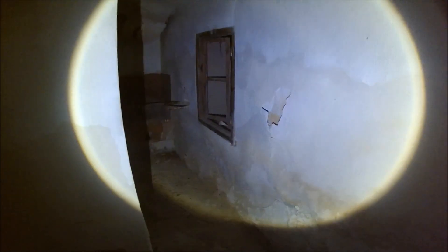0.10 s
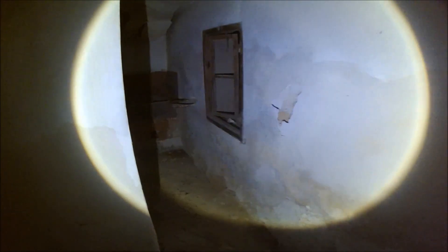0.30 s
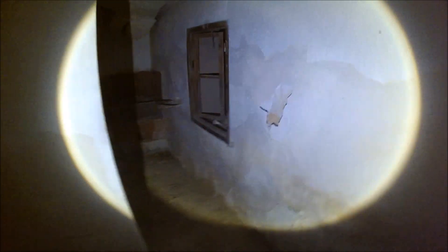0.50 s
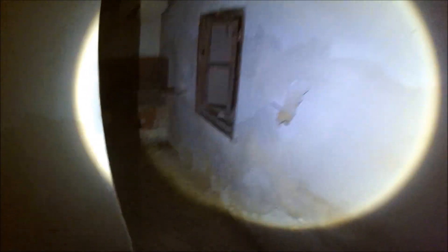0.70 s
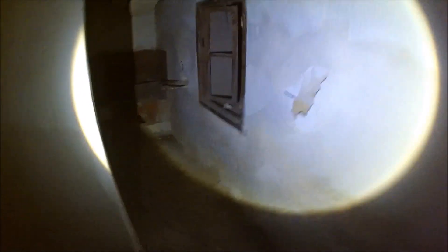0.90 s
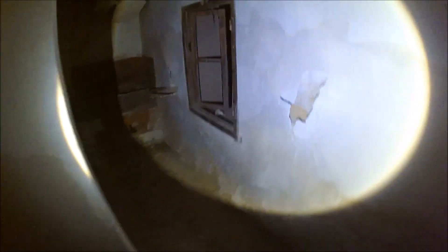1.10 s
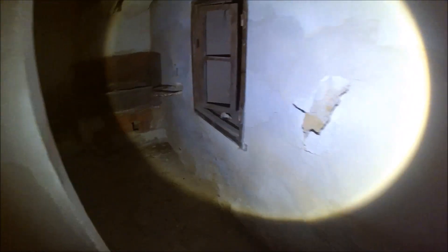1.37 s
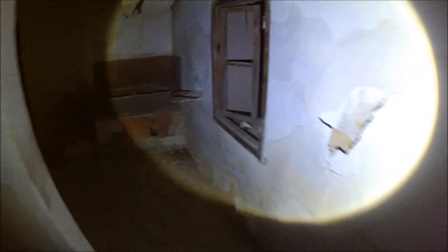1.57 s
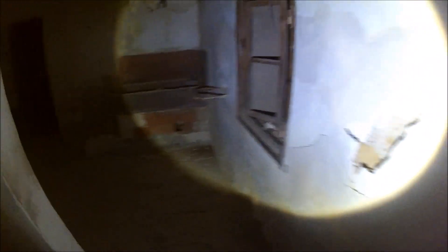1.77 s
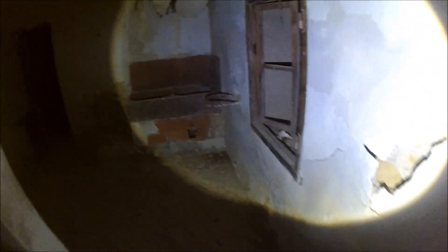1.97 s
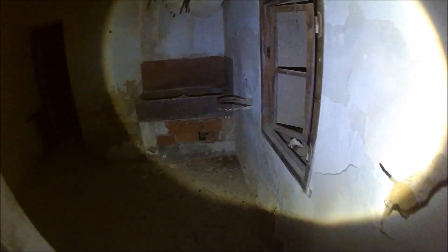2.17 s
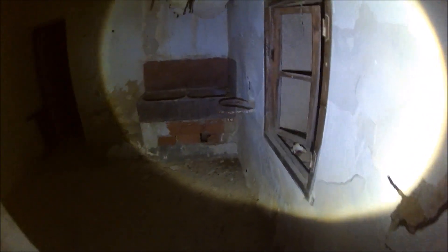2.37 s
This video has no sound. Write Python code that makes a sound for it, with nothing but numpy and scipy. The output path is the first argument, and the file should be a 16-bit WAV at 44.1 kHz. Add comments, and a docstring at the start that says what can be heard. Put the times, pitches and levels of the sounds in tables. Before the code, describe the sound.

Slow footsteps knock and crunch over plaster rubble in a small, bare, echoing room

```python
"""Steps over rubble in a small bare room

Plaster and brick knock under the shoes (damped rings and cracks), soles grind on grit (resonant grains)
and footfalls thud softly (low noise bursts); all three echo in the room. Close by, a hand rubs on a camera's
case (dense slips), which clicks sharply and later faintly (ringing modes). The narrow, nasal microphone
colours all of these; a steady hiss with a faint high whine lies underneath."""
import sys
import numpy as np
from scipy import signal
from scipy.fft import rfft, irfft
from scipy.io import wavfile

SR = 44100
rng = np.random.default_rng(int(sys.argv[2]) if len(sys.argv) > 2 else 0)


def wav_record(signal):
    """Record a signal, one row per channel, as 16-bit PCM in the file named by sys.argv[1]."""
    frames = np.transpose(np.atleast_2d(signal))
    bounded = np.clip(frames, -1, 1)
    # unit amplitude maps onto the largest positive 16-bit level
    quanta = np.round(bounded * 32767).astype(np.int16)
    wavfile.write(sys.argv[1], SR, quanta)


N = 110250
TIME_S = np.arange(N) / SR

# steady hiss, relative spectrum: freq_hz, level_db
HISS_SPECTRUM = [(30, -33.5), (100, -24.5), (300, -19.5), (600, -15), (950, -8), (1350, -0.5), (1850, 2),
                 (2400, -2.5), (3400, -9), (4400, -21.5), (5200, -28), (6000, -43.5), (7000, -37),
                 (8000, -42.5), (9000, -36.5), (10500, -29), (12500, -29.5), (15500, -28.5)]
HISS_DB, HISS_WAVER_DB, HISS_WAVER_CUTOFF_HZ = -64.5, 1.1, 36
WHINE_HZ, WHINE_RMS_DB = 15714, -95.5

# microphone behind its small port: freq_hz, gain_db
MIC_RESPONSE = [(60, -42.5), (180, -35.5), (400, -31), (650, -25), (900, -13.5), (1100, -15.5),
                (1350, -5.5), (1800, -3), (2300, -7), (3000, -9), (3500, -14.5), (4400, -20.5),
                (5000, -28.5), (5500, -38), (6050, -59.5), (7000, -48.5), (8000, -56), (8800, -46),
                (10500, -33), (12500, -43.5), (14500, -41), (16000, -55)]
CUTOFF_HZ = 15850

# early echoes off floor and wall: delay_s, level_db
EARLY_ECHOES = [(.0040, -11.5), (.0175, -26)]
ROOM_DB, ROOM_T60_S = -4, 0.32
LATE_DB, LATE_T60_S = -24.5, 1
TAIL_BUILD_S, REFLECTIONS_PER_S = 0.002, 1300

# hand rubs on the case: start_s, length_s, level_db
HAND_RUBS = [(0.105, 0.023, -37.5), (0.131, 0.09, -43.5), (0.18, 0.048, -39), (.222, 0.045, -42.5),
             (0.774, 0.048, -25), (0.834, 0.021, -32.5), (0.878, 0.056, -38)]
# colour of the rubbing: freq_hz, gain_db
RUB_RESPONSE = [(150, -10.5), (800, -6), (1250, -4.5), (1700, 0), (2250, 3.5), (2800, -10), (3400, 0.5),
                (4600, -3.5), (7000, -1.5), (10500, -9.5), (15000, -2)]
RUB_ATTACK_S, RUB_RELEASE_S, SLIPS_PER_S = 0.011, 0.0096, 3500

# case clicks: start_s, level_db, edge_db
CLICKS = [(0.2213, 15.5, -5), (0.2233, -0.5, -46.5), (1.513, -33, 5)]
# modes of the case: freq_hz, width_hz, level_db
CLICK_MODES = [(567, 110, -3.5), (890, 71, -9.5), (1785, 186, 8), (2600, 440, 2), (2950, 130, -0.5),
               (3560, 290, 2), (4130, 390, 5.5), (4870, 620, 4.5), (10750, 800, 0)]
CLICK_EDGE_HZ = 8500

# weight comes down on the floor: start_s, level_db, decay_s, centre_hz
FOOT_THUDS = [(0.109, -36, 0.0081, 200), (0.371, -41, 0.016, 310), (0.554, -32.5, 0.068, 120),
              (1.306, -42, 0.031, 580), (1.419, -43.5, .08, 330), (2.095, -49.5, 0.041, 250)]
THUD_ATTACK_S, THUD_WIDTH_HZ = 0.0049, 220

# sole grinds on grit: start_s, length_s, level_db, centre_hz
SOLE_SCUFFS = [(0.393, 0.035, -48, 1790), (0.454, 0.051, -40, 2100), (0.49, 0.036, -37.5, 3000),
               (0.558, 0.061, -34, 1100), (0.665, 0.099, -44, 1900), (0.931, 0.046, -48, 1350),
               (1.177, 0.041, -48.5, 2180), (1.295, 0.024, -38, 1200), (1.371, 0.01, -43, 1800),
               (1.381, 0.08, -36, 1670), (1.61, 0.018, -39.5, 2100), (1.637, 0.041, -40.5, 1050),
               (2.091, 0.013, -31, 1170), (2.29, 0.014, -44, 1300), (2.485, 0.026, -43, 2250)]
SCUFF_ATTACK_S, SCUFF_RELEASE_S, SCUFF_WIDTH_HZ = 0.021, 0.01, 740
GRIT_PER_S, RAW_GRIT_DB = 2100, -6.5

# rubble knocks: start_s, ring_db, ring_hz, overtone_db, crack_db, contact_hz (hardness, as low-pass cutoff)
RUBBLE_KNOCKS = [(0.1114, 2, 890, 6, -8.5, 2870), (0.374, -7.5, 1430, -1, -23, 3580),
                 (0.4744, -10.5, 1544, -7.5, -16, 4500), (.557, 10.5, 994, 6.5, -10.5, 2500),
                 (0.5585, -4, 1310, -10, -18, 2500), (0.5757, -17, 1480, -9, -19, 3000),
                 (0.599, 7.5, 1050, -7.5, -11, 3000), (0.934, -1, 1230, -18, -16, 3020),
                 (1.187, -13.5, 1420, -25.5, -34, 2440), (1.306, -3.5, 1500, -8, -7.5, 3910),
                 (1.374, -12, 1470, -17.5, -17.5, 4000), (1.3979, -5, 1590, 7, -6.5, 4000),
                 (1.455, -7, 1325, -12, -8.5, 5100), (1.514, 3.5, 1490, -6.5, -3.5, 3230),
                 (1.5967, 11, 1394, -39, -16.5, 2200), (1.6248, -4.5, 1880, -0.5, -10.5, 3370),
                 (2.075, 13, 1350, 3, -13, 2200), (2.0931, 19.5, 1238, -2.5, -4.5, 2640),
                 (2.302, -6.5, 1340, -14, -26, 3000), (2.413, -15, 1340, -16, -29, 3000),
                 (2.471, -17.5, 1540, -7, -25.5, 4000)]
KNOCK_WIDTH_HZ, OVERTONE_RATIO = 190, 1.56


def from_db(db):
    """Decibels to gain."""
    return 10 ** (np.asarray(db) / 20)


def rms_one(x):
    """Scale to unit rms."""
    return x / np.sqrt(np.mean(x ** 2) + 1e-20)


def impulse(start_s):
    """Unit click at start_s, on a negligible constant floor."""
    return 1.0 * (np.arange(N) == int(start_s * SR)) + 1e-18


def band(x, cutoff_hz, kind, order=2):
    """Butterworth filter."""
    safe_hz = np.clip(cutoff_hz, 10, 0.45 * SR)
    return signal.sosfilt(signal.butter(order, safe_hz, kind, fs=SR, output="sos"), x)


def resonate(x, centre_hz, width_hz):
    """One two-pole resonance with about unit gain at its peak."""
    radius = np.exp(-np.pi * width_hz / SR)
    numerator = np.array([1, 0, -1]) * (1 - radius * radius) / 2
    denominator = [1, -2 * radius * np.cos(2 * np.pi * centre_hz / SR), radius * radius]
    return signal.lfilter(numerator, denominator, x)


def colour(x, points, size=4096):
    """Causal minimum-phase filter through (freq_hz, gain_db) points, by folding the cepstrum."""
    point_hz, point_db = np.transpose(points)
    bin_hz = np.arange(size // 2 + 1) * SR / size
    gain_db = np.interp(np.log(bin_hz + 1), np.log(point_hz), point_db)
    cepstrum = irfft(np.log(from_db(gain_db)))
    cepstrum[1:size // 2] *= 2
    cepstrum[size // 2 + 1:] = 0
    response = irfft(np.exp(rfft(cepstrum)))
    return signal.fftconvolve(x, response)[:N]


def stroke(start_s, length_s, attack_s, release_s):
    """Envelope: linear rise, hold, exponential release from start_s + length_s."""
    rise = np.clip((TIME_S - start_s) / attack_s, 0, 1)
    return rise * np.exp(-np.maximum(TIME_S - start_s - length_s, 0) / release_s)


def grains(per_s, spread_db):
    """Random tiny clicks of uneven size and either sign, unit rms."""
    sizes = from_db(spread_db * np.minimum(rng.exponential(1, N), 3))
    present = rng.random(N) < per_s / SR
    return rms_one(present * sizes * rng.choice([-1, 1], N))


def hiss():
    """Coloured noise, wavering slightly in level, with a faint electronic whine."""
    waver = rms_one(band(rng.standard_normal(N), HISS_WAVER_CUTOFF_HZ, "low"))
    noise = rms_one(colour(rng.standard_normal(N), HISS_SPECTRUM))
    whine = np.sqrt(2) * np.sin(2 * np.pi * WHINE_HZ * TIME_S)
    return noise * from_db(HISS_DB + HISS_WAVER_DB * waver) + from_db(WHINE_RMS_DB) * whine


def tail(t60_s):
    """Diffuse decay of unit energy: sparse reflections that build up, then die away."""
    build = 1 - np.exp(-TIME_S / TAIL_BUILD_S)
    decay = grains(REFLECTIONS_PER_S, spread_db=1.5) * from_db(-60 * TIME_S / t60_s) * build
    return decay / np.sqrt(np.sum(decay ** 2))


def room(x):
    """Direct sound, two early echoes, the room's tail and a faint longer one from the rest of the building."""
    response = impulse(0) + sum(from_db(level_db) * impulse(delay_s) for delay_s, level_db in EARLY_ECHOES)
    response = response + from_db(ROOM_DB) * tail(ROOM_T60_S)
    response = response + from_db(LATE_DB) * tail(LATE_T60_S)
    return signal.fftconvolve(x, response)[:N]


def rubs():
    """Dense tiny slips of the hand on the case."""
    envelope = sum(from_db(level_db) * stroke(start_s, length_s, RUB_ATTACK_S, RUB_RELEASE_S)
                   for start_s, length_s, level_db in HAND_RUBS)
    return colour(grains(SLIPS_PER_S, spread_db=2.0) * envelope, RUB_RESPONSE)


def case_clicks():
    """Dry plastic snaps at the microphone: hits ring the case modes, hard edges add treble."""
    hits = sum(from_db(level_db) * impulse(start_s) for start_s, level_db, _ in CLICKS)
    edges = sum(from_db(edge_db) * impulse(start_s) for start_s, _, edge_db in CLICKS)
    out = band(edges, CLICK_EDGE_HZ, "high")
    for k, (freq_hz, width_hz, level_db) in enumerate(CLICK_MODES):
        sign = (-1) ** k  # neighbouring modes in opposite phase
        out = out + sign * from_db(level_db) * resonate(hits, freq_hz, width_hz)
    return out


def thuds():
    """A short low rumble as the foot takes weight: resonant noise with a quick rise and decay."""
    noise = rng.standard_normal(N)
    out = 0
    for start_s, level_db, decay_s, centre_hz in FOOT_THUDS:
        rumble = rms_one(resonate(noise, centre_hz, THUD_WIDTH_HZ))
        out = out + from_db(level_db) * stroke(start_s, 0, THUD_ATTACK_S, decay_s) * rumble
    return out


def scuffs():
    """Grit crackles under the sole, with a broad resonance that differs from place to place."""
    grit = grains(GRIT_PER_S, spread_db=0.5)
    out = 0
    for start_s, length_s, level_db, centre_hz in SOLE_SCUFFS:
        crackle = resonate(grit, centre_hz, SCUFF_WIDTH_HZ) + from_db(RAW_GRIT_DB) * grit
        envelope = stroke(start_s, length_s, SCUFF_ATTACK_S, SCUFF_RELEASE_S)
        out = out + from_db(level_db) * envelope * crackle
    return out


def knocks():
    """Each piece of rubble gives a crack and two short rings; a soft contact dulls all three."""
    out = 0
    for start_s, ring_db, ring_hz, overtone_db, crack_db, contact_hz in RUBBLE_KNOCKS:
        hit = band(impulse(start_s), contact_hz, "low")
        ring = from_db(ring_db) * resonate(hit, ring_hz, KNOCK_WIDTH_HZ)
        overtone = from_db(overtone_db) * resonate(hit, ring_hz * OVERTONE_RATIO, KNOCK_WIDTH_HZ)
        out = out + ring - overtone + from_db(crack_db) * hit
    return out


def scene():
    """Steps in the room and dry handling sounds, both through the microphone port, over the hiss."""
    steps = room(knocks() + scuffs() + thuds())
    handling = rubs() + case_clicks()
    return (colour(steps + handling, MIC_RESPONSE) + hiss())[None]


def record(dry):
    """Steep elliptic low-pass cuts the top."""
    return signal.sosfilt(signal.ellip(12, 0.1, 70, CUTOFF_HZ, fs=SR, output="sos"), dry)


dry = scene()
out = record(dry)
wav_record(out)
```